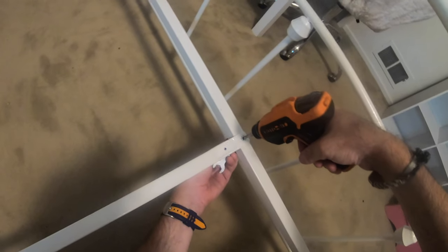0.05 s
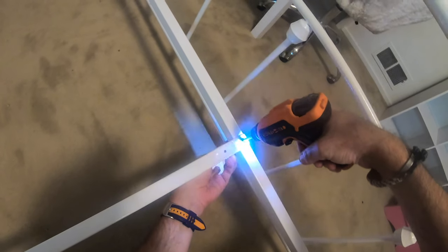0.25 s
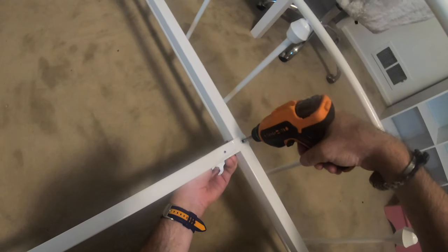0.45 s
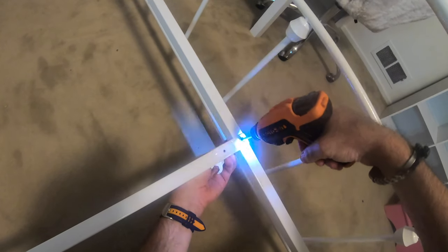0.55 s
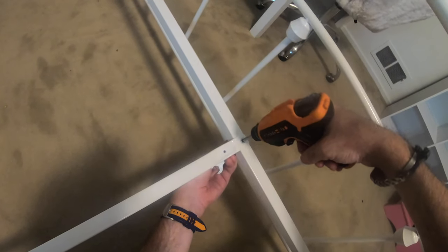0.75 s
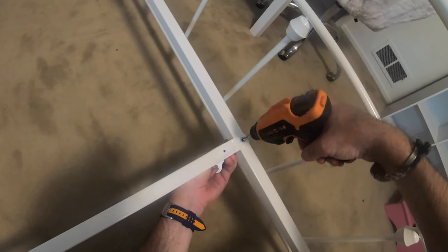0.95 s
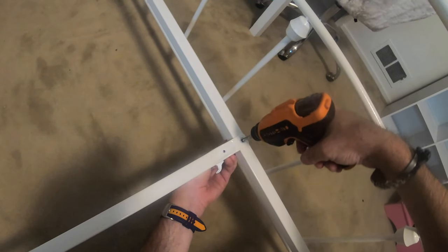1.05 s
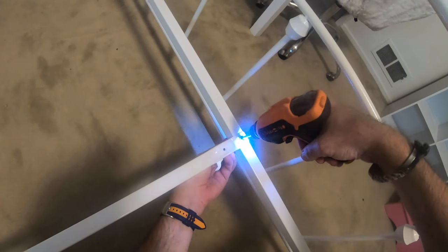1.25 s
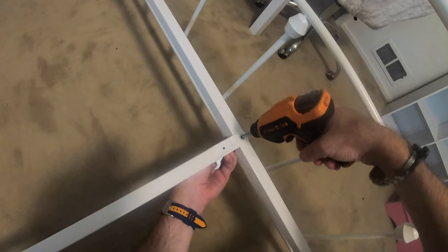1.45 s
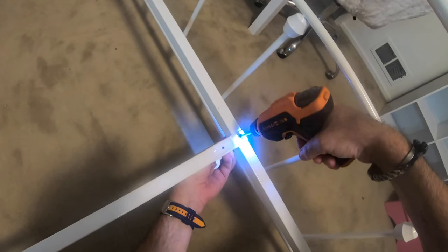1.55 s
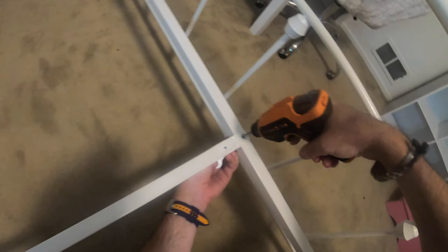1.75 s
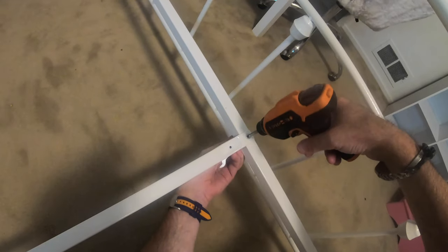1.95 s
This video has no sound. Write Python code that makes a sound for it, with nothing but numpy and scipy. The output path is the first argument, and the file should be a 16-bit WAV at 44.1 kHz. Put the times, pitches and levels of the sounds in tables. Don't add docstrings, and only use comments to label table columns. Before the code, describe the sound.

Close up in a hard bare room, an electric screwdriver is pulsed five times, each grinding whine ringing the metal frame and trailing off; a sharp snap precedes the last pulse, faint ticks end it.

```python
import sys
import numpy as np
from scipy import signal
from scipy.fft import rfft, irfft
from scipy.io import wavfile

SR = 44100
rng = np.random.default_rng(int(sys.argv[2]) if len(sys.argv) > 2 else 0)


def how_loud(loudness_db):
    steps = np.asarray(loudness_db, float) / 20
    return 10 ** steps


def digitize_waveform(pressure):
    field = np.atleast_2d(pressure).T
    bounded = np.clip(field, -1, 1)
    quanta = np.round(bounded * 32767).astype(np.int16)
    wavfile.write(sys.argv[1], SR, quanta)


N = 88200
PRE = SR // 2
M = N + PRE

# f/Hz, level/dB
AIR_COLOUR = [(35, -59), (60, -13.5), (166, -13.5), (458, -24.5), (816, -12.5), (2060, -6), (2360, -28),
              (3270, -20), (15000, -55.5)]
AIR_DB = -60
HUM_HZ, HUM_WIDTH_HZ, HUM_DB = 163, 8, -61
RUMBLE_DB, RUMBLE_HZ = -71, 45

# f/Hz, t60/s
ROOM_T60 = [(150, 1), (500, .5), (1500, 0.57), (3000, 0.35), (6000, .35), (12000, 0.28)]
ROOM_DB, ROOM_BUILD_S = -7, 0.0032
# f/Hz, likeness/1
LIKENESS = [(60, -0.22), (150, 0.45), (380, 0.69), (950, 0.12), (2380, 0.64), (5980, 0.3), (15000, -2.12)]
# f/Hz, level/dB
LEAN = [(60, -1.5), (150, -2), (380, -2.0), (950, -1.5), (2380, -0.5), (5980, -1.5), (15000, -4)]
MOST_OPPOSED, DIRECT_WIDTH = .15, 0.53

# f/Hz, level at the start/dB, t60/s
FAR_TUBES = [(540, -70.5, 2), (815, -60.5, 0.84), (1450, -63, 0.84), (1750, -63, 1.2), (2192, -62, 0.5),
             (3250, -62.5, 1)]
FAR_WAVER_DB = 3

SHIFT_S, SHIFT_RISE_S, SHIFT_DB, SHIFT_LOW_HZ, SHIFT_HIGH_HZ = 1.93, .03, -66, 2483.6, 7556
SHIFT_HUM_HZ, SHIFT_HUM_DB = 271.4, -56

# t/s, peak level/dB, lowest f/Hz, highest f/Hz, room share/dB
TICKS = [
    (0.15, -46, 1900, 3330, -12),
    (.150, -54, 4300, 5500, -12),
    (1.186, -29.5, 2300, 5160, -11),
    (1.4204, -17.5, 3459, 9695, 3),
    (1.4197, -18, 1170, 3460, -5.5),
    (1.90, -43, 2000, 4030, 2),
    (1.936, -45, 2000, 6930, -3),
    (1.95, -39, 2680, 4900, 0.5),
    (1.989, -40, 2000, 3930, -20),
]
TICK_T60_S, TICK_RISE_S = .014, .0003

# f/Hz, level/dB, t60/s
FRAME_MODES = [(163.8, 6.5, 0.79), (238.4, 5.5, .22), (323.8, -9, 0.54), (586.9, -3.5, 0.29),
               (722, -7, 0.68), (1553, -12.5, 0.32), (1700, -25, 0.27), (2035, -19.5, 0.36),
               (2240, -12.5, 0.12)]
FRAME_DB, FRAME_WAVER_HZ = -30.5, 18

# t/s, gear mesh rate f/Hz, level/dB
EARLIER_BURST = [(-.3, 815, -39), (-.21, 815, -39.5)]
BURST_1 = [(0.213, 646.3, -56), (0.225, 759.6, -23.5), (0.233, 773.2, -26.5), (0.273, 977.4, -16),
           (0.289, 1020, -17.5), (0.309, 1011, -17), (0.358, 967, -19.5)]
BURST_2 = [(0.582, 626.7, -35), (0.606, 642.4, -22.5), (0.622, 793, -16.5), (0.638, 835.5, -19.5),
           (0.652, 886.8, -18), (0.686, 844.7, -19), (0.7, 871, -24.5)]
BURST_3 = [(0.893, 556.9, -32), (0.913, 601.1, -23.5), (0.927, 689.7, -18.5), (0.935, 736.4, -18.5),
           (0.959, 750.6, -17.5), (0.981, 712.7, -11.5), (1.0, 733, -45)]
BURST_4 = [(1.245, 634.4, -30.5), (1.257, 645.3, -16), (1.269, 614.5, -21), (1.291, 650.2, -14),
           (1.315, 656.7, -18.5), (1.343, 587, -17), (1.355, 586.2, -30)]
BURST_5 = [(1.606, 587.6, -45), (1.618, 649.6, -16.5), (1.628, 713.2, -18.5), (1.636, 722.0, -17),
           (1.642, 707.7, -17), (1.652, 650.2, -22.5), (1.668, 608.2, -22.5)]
BURSTS = [EARLIER_BURST, BURST_1, BURST_2, BURST_3, BURST_4, BURST_5]
ROUGHNESS = [
    .9,
    .25,
    .25,
    .18,
    .1,
    .3,
]
# lowest partial level/dB, second partial level/dB, tilt of the rest/(dB/octave)
VOICING = [
    (-5, 15.5, 12),
    (-0.5, 2.5, 4),
    (1, 2, 0),
    (2, -2.5, -2.7),
    (6.5, 1.5, -2.8),
    (6, -7.5, -1),
]
# f/Hz, level/dB
MESH_COLOUR = [(240, -37), (400, -23), (994, -3.5), (1250, -4), (2620, 1), (3190, -7), (4460, -2.5),
               (7930, -37.5), (15000, -53)]
# f/Hz, level/dB
RATTLE_COLOUR = [(59, -71), (100, -28.5), (1400, -7.5), (2000, -8), (2320, -12.5), (4020, -13),
                 (4660, -15.5), (8060, -14), (15500, -39.5)]
# f/Hz, width/Hz, level/dB
HOUSING = [(2000, 1450, 8.5), (3780, 1200, 4), (4640, 83, -17.5), (7240, 400, 0)]
MESH_DB, RATTLE_DB = 0, 3
START_S, STOP_S = .003, .006
TOOTH_JITTER, TOOTH_SPREAD_DB = .004, 1.2
WOBBLE_DB, WOBBLE_HZ, OVERTONE_WOBBLE_DB = 5.5, 55.6, 6
SPIN_UP_S, SPIN_UP_ROUGH = .025, .5
LOW_CUT_HZ, DULL_START_HZ, BRIGHTEN_S = 250, 2600, 0.022

# f/Hz, level/dB
TREBLE_RESPONSE = [(9603, 0), (10197, -4), (15300, -4), (15700, -50)]


def rms_one(x):
    return x / np.sqrt(np.mean(x ** 2) + 1e-20)


def at_hz(points, hz):
    p = np.array(points)
    return np.interp(np.log(np.maximum(hz, 1)), np.log(p[:, 0]), p[:, 1])


def colour(x, spectrum):
    n = x.shape[-1]
    return irfft(rfft(x) * how_loud(at_hz(spectrum, np.fft.rfftfreq(n, 1 / SR))), n)


def passband(x, low_hz, high_hz):
    return signal.sosfilt(signal.butter(2, [low_hz, high_hz], "band", fs=SR, output="sos"), x)


def drift(hz):
    return rms_one(signal.sosfilt(signal.butter(2, hz, fs=SR, output="sos"), rng.standard_normal(M)))


def ring(x, hz, t60):
    r, w = how_loud(-60 / (t60 * SR)), 2 * np.pi * hz / SR
    return signal.lfilter([0, np.sin(w)], [1, -2 * r * np.cos(w), r * r], x + 1e-18)


def clock():
    return (np.arange(M) - PRE) / SR


def widen(mid, side):
    n = mid.shape[-1]
    hz = np.fft.rfftfreq(n, 1 / SR)
    alike = np.clip(at_hz(LIKENESS, hz), -MOST_OPPOSED, 1)
    sign = np.array([[1], [-1]])
    pair = np.sqrt(1 + alike) * rfft(mid) + sign * np.sqrt(1 - alike) * rfft(side)
    lean = how_loud(sign * at_hz(LEAN, hz) / 2)
    return irfft(pair * lean / np.sqrt(2), n)


def room_air():
    air = rms_one(colour(rng.standard_normal((2, M)), AIR_COLOUR))
    hum_filter = signal.iirpeak(HUM_HZ, HUM_HZ / HUM_WIDTH_HZ, fs=SR)
    hum = rms_one(signal.lfilter(*hum_filter, rng.standard_normal(M)))
    rumble = np.array([drift(RUMBLE_HZ), drift(RUMBLE_HZ)])
    return how_loud(AIR_DB) * widen(*air) + how_loud(HUM_DB) * hum + how_loud(RUMBLE_DB) * rumble


def room_response():
    t, out = np.arange(SR) / SR, 0
    edges = 40 * 2 ** np.arange(0, 9, .5)
    white = rng.standard_normal((2, 2, SR))
    for k, (low, high) in enumerate(zip(edges, edges[1:])):
        band = passband(white[k % 2], low, high)
        t60 = at_hz(ROOM_T60, np.sqrt(low * high))
        out = out + band * how_loud(-60 * t / t60) * (1 - np.exp(-t / ROOM_BUILD_S))
    return widen(*out) / np.sqrt(np.sum(out[0] ** 2))


def far_tubes():
    t = clock()
    sides = np.zeros((2, M))
    for side in sides:
        for hz, db, t60 in FAR_TUBES:
            level = how_loud(db - 60 * np.maximum(t, 0) / t60 + FAR_WAVER_DB * drift(25.))
            side += level * np.sqrt(2) * np.sin(2 * np.pi * hz * t + drift(20.))
    return widen(*sides)


def hand_shift():
    swell = np.clip((clock() - SHIFT_S) / SHIFT_RISE_S, 0, 1)
    rub = rms_one(passband(rng.standard_normal((2, M)), SHIFT_LOW_HZ, SHIFT_HIGH_HZ))
    rub = how_loud(SHIFT_DB + 2.4 * drift(71.0)) * rub
    hum = how_loud(SHIFT_HUM_DB) * rms_one(ring(rng.standard_normal(M), SHIFT_HUM_HZ, 0.046))
    return swell * (widen(*rub) + hum)


def ticks():
    out, t = np.zeros((2, M)), np.arange(SR // 20) / SR
    for s, db, low_hz, high_hz, room_db in TICKS:
        i = int(s * SR) + PRE
        snap = np.sign(rng.standard_normal(len(t))) * how_loud(-60 * t / TICK_T60_S) * (1 - np.exp(-t / TICK_RISE_S))
        snap[4] += 6
        snap = passband(passband(snap, low_hz, high_hz), low_hz, high_hz)
        snap = how_loud(db) * snap / np.abs(snap).max()
        out[:, i:i + len(t)] += snap[:M - i] * how_loud(np.array([[0], [room_db]]))
    return out


def frame(x):
    out = 0
    for hz, db, t60 in FRAME_MODES:
        waver = .6 + 0.89 * drift(FRAME_WAVER_HZ)
        out = out + how_loud(db + FRAME_DB) * ring(x, hz, np.minimum(t60, .8)) * waver / np.sqrt(t60 * 100)
    return out


def housing(x):
    for hz, width_hz, db in HOUSING:
        x = x + (how_loud(db) - 1) * signal.lfilter(*signal.iirpeak(hz, hz / width_hz, fs=SR), x)
    return x


def trigger():
    t = clock()
    rate, voice = np.full(M, 700.), np.zeros((3, M))
    gain, rough, age = np.zeros((3, M))
    for rows, share, grip in zip(BURSTS, ROUGHNESS, VOICING):
        s, hz, db = np.transpose(rows)
        near = (t > s[0] - .05) & (t < s[-1] + .1)
        gate = np.clip((t - s[0]) / START_S + 1, 0, 1) * np.exp(-np.maximum(t - s[-1], 0) / STOP_S)
        age[near] = np.maximum(t - s[0], 0)[near]
        rate[near] = np.interp(t, s, hz)[near]
        voice[:, near] = np.array(grip)[:, None]
        rough[near] = share + (1 - share) * SPIN_UP_ROUGH * np.exp(-(age[near] / SPIN_UP_S) ** 2)
        gain[near] = (how_loud(np.interp(t, s, db)) * gate)[near]
    return rate, gain, rough, age, voice


def gear_mesh(turns, voice):
    tooth_levels = how_loud(TOOTH_SPREAD_DB * np.clip(rng.standard_normal(4000), -2, 2))
    tooth = tooth_levels[turns.astype(int) % 4000]
    levels = [voice[0], voice[1]] + [voice[2] * np.log2(k / 3) for k in range(3, 16)]
    pulses = 0
    for k, db in enumerate(levels, 1):
        height = how_loud(db + OVERTONE_WOBBLE_DB * np.tanh(drift(WOBBLE_HZ)))
        pulses = pulses + height * np.cos(2 * np.pi * k * turns + .1 * k * drift(25.))
    wobble = how_loud(MESH_DB + WOBBLE_DB * np.tanh(drift(WOBBLE_HZ)))
    return wobble * rms_one(housing(colour(tooth * pulses, MESH_COLOUR)))


def rattle(turns):
    gated = rng.standard_normal(M) * (1 + 0.22 * np.cos(2 * np.pi * turns))
    wobble = how_loud(RATTLE_DB + 2.5 * np.tanh(drift(120.)))
    return wobble * rms_one(housing(colour(gated, RATTLE_COLOUR)))


def driver():
    rate, gain, rough, age, voice = trigger()
    turns = np.cumsum(rate * (1 + TOOTH_JITTER * drift(230.0))) / SR
    x = gain * (np.sqrt(1 - rough) * gear_mesh(turns, voice) + np.sqrt(rough) * rattle(turns))
    bright = 1 - np.exp(-age / BRIGHTEN_S)
    x = bright * x + (1 - bright) * passband(x, LOW_CUT_HZ, DULL_START_HZ)
    return passband(x, LOW_CUT_HZ, .4 * SR)


def scene():
    tool, (tick, tick_far) = driver(), ticks()
    tool = tool + frame(tool)
    near = tool + tick
    direct = widen(near, DIRECT_WIDTH * np.imag(signal.hilbert(near)))
    room_feed = how_loud(ROOM_DB) * tool + tick_far
    wet = signal.fftconvolve(room_feed[None], room_response(), axes=1)[:, :M]
    return (direct + wet + hand_shift() + far_tubes() + room_air())[:, PRE:]


def low_pass(x):
    return signal.sosfilt(signal.butter(12, 15690, fs=SR, output="sos"), x)


def record(dry):
    mix = colour(dry, TREBLE_RESPONSE)
    return low_pass(mix)


dry = scene()
out = record(dry)
digitize_waveform(out)
```